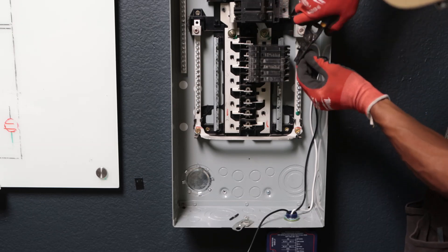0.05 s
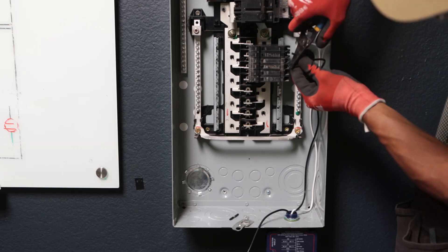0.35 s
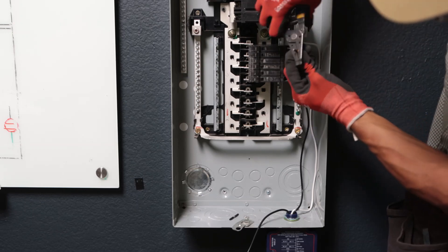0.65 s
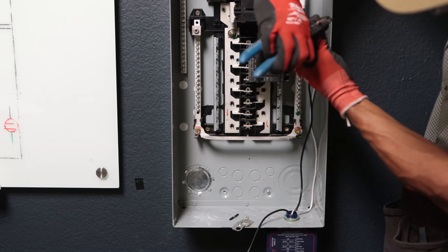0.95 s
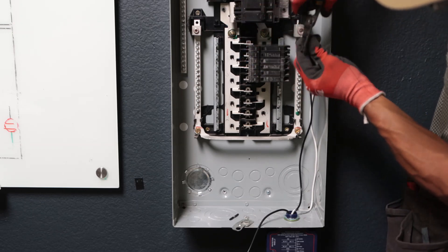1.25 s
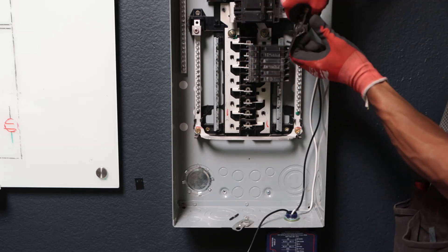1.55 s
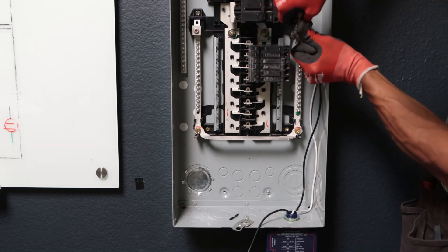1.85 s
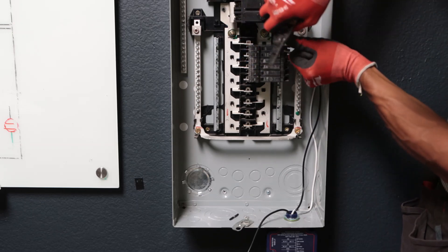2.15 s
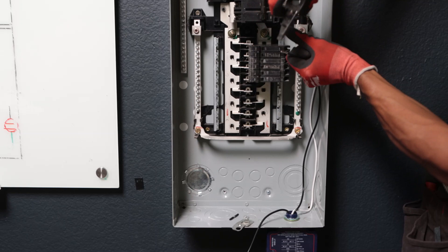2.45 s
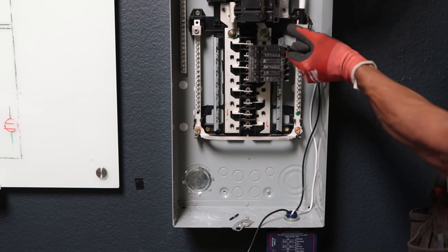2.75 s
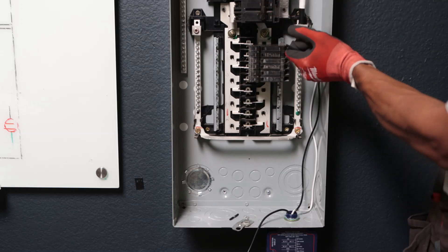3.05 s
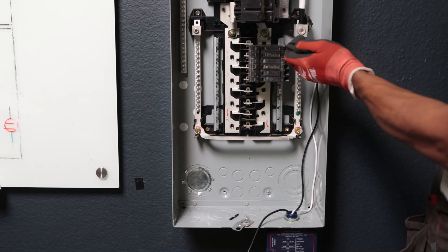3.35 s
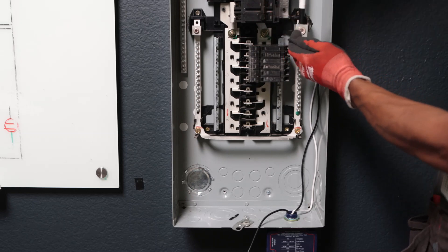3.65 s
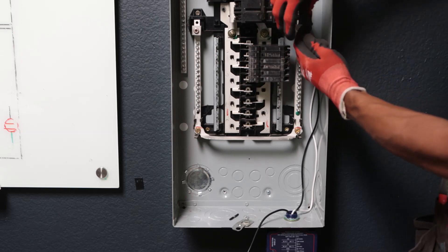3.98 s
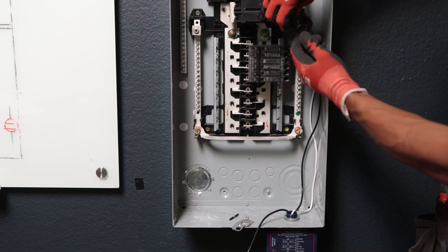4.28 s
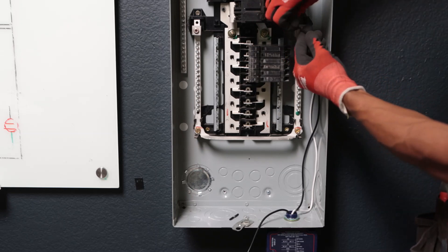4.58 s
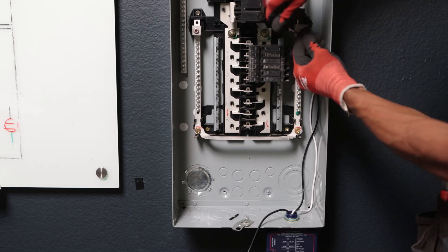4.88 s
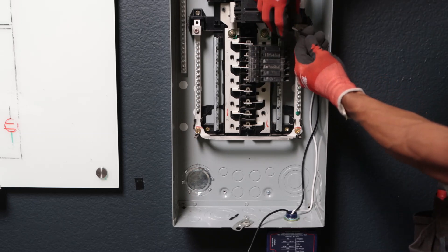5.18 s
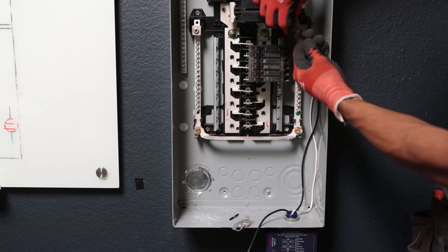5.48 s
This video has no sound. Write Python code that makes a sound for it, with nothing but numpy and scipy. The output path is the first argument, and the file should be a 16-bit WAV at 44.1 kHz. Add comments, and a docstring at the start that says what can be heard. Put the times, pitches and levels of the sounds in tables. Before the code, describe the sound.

A hand tool works inside an open steel electrical panel, making irregular knocks and small ticks that ring briefly and draw soft booms from the cabinet. Then comes the loudest sound, a sharp snap with a quick rattle of steel. Afterwards the tool taps thinly on a terminal while gloves and wires slide quietly. It all sounds close, in a small room with a faint rumble and hiss.

```python
"""In a small bare room, gloved hands work with a hand tool in an open steel breaker panel.
The tool knocks on breakers, ticks on wires and taps at a terminal; once a part snaps free
with a loud metallic clatter. Each hit is a burst of noise plus the fading tones of the metal.
Hits and pushes make the cabinet boom softly; gloves and wires rub over a low room noise."""
import sys
import numpy as np
from scipy import signal
from scipy.fft import rfft, irfft, next_fast_len
from scipy.io import wavfile
from scipy.ndimage import uniform_filter1d

SR = 44100
rng = np.random.default_rng(int(sys.argv[2]) if len(sys.argv) > 2 else 0)


def transcribe(signal):
    """Save signal, clipped to [-1, 1], as a 16-bit WAV file at the path in sys.argv[1]."""
    frames = np.atleast_2d(signal).T
    limited = np.clip(frames, -1, 1)
    pcm = np.round(limited * 32767).astype(np.int16)
    wavfile.write(sys.argv[1], SR, pcm)


N = 252233
FADE_TIME = np.arange(SR // 2) / SR  # seconds since a hit began

# tone colour of the tool's knocks and taps: pitch_hz, level_db
TOOL_COLOUR = [(100, -15.5), (230, -14.5), (300, -17.5), (450, -1), (700, -3.5), (880, -7.5), (1400, 0.5),
               (2200, -6.5), (3300, -9), (4000, -13), (5500, -14), (7200, -19.5), (8500, -26.5),
               (11000, -27), (15000, -48)]


def amp(db):
    return 10 ** (np.asarray(db) / 20)


def unit(x):
    return x / np.sqrt(np.mean(x ** 2) + 1e-20)


def unit_attack(x):
    """Scale each hit so its first 20 ms have an average power of 1."""
    return x / np.sqrt(np.mean(x[..., :SR // 50] ** 2, axis=-1, keepdims=True) + 1e-20)


def along(points, hz):
    """Read a curve between its points, on a musical pitch scale."""
    pitches, values = np.transpose(points)
    return np.interp(np.log(hz + 1), np.log(pitches + 1), values)


def add(track, start_s, sound):
    """Mix a sound into the track."""
    part = track[max(round(start_s * SR), 0):][:len(sound)]
    part += sound[:len(part)]


def placed(times, sounds):
    """A track with each sound at its time."""
    track = np.zeros(N)
    for start_s, sound in zip(times, sounds):
        add(track, start_s, sound)
    return track


def coloured(x, colour):
    """Make each pitch louder or softer to give a tone colour."""
    size = x.shape[-1]
    padded = 2 * next_fast_len(size // 2 + 2048, True)
    gain = amp(along(colour, np.fft.rfftfreq(padded, 1 / SR)))
    cepstrum = irfft(np.log(gain))
    # fold the filter so that nothing sounds before the hit
    cepstrum[1:padded // 2] *= 2
    cepstrum[padded // 2 + 1:] = 0
    return irfft(rfft(x, padded) * np.exp(rfft(cepstrum)))[..., :size]


def noise(colour, size):
    return unit(coloured(rng.standard_normal(size), colour))


def ringing(tones, count, scatter_db, rise_s):
    """Metal rings in a new mix of its tones at each hit; a tone drops 60 dB in fade_s."""
    pitch_hz, level_db, fade_s = np.transpose(tones)[:, :, None]
    waves = amp(level_db - 60 * FADE_TIME / fade_s) * np.exp(2j * np.pi * pitch_hz * FADE_TIME)
    shape = (count, len(tones))
    strength = amp(scatter_db * rng.standard_normal(shape))
    phase = np.exp(2j * np.pi * rng.random(shape))
    swell = 1 - np.exp(-FADE_TIME / rise_s)
    return unit_attack(((strength * phase) @ waves).imag * swell)


def contacts(colour, count, crack_db, crack_fade_s):
    """Each contact cracks, then echoes in cabinet and room; high pitches die first."""
    # how long cabinet and room ring: pitch_hz, fade_s
    echo_fades = [(150, 0.4), (550, 0.5), (1000, 0.39), (3000, 0.33), (6000, 0.32), (13000, 0.19)]
    white = rng.standard_normal((count, len(FADE_TIME)))
    hz, times, spectrum = signal.stft(white, SR, nperseg=256)
    fade = amp(-60 * times / along(echo_fades, hz)[:, None])
    echo = signal.istft(spectrum * fade, SR, nperseg=256)[1][:, :len(FADE_TIME)]
    crack = amp(crack_db - 60 * FADE_TIME / crack_fade_s) * rng.standard_normal(white.shape)
    return unit_attack(coloured(crack + echo, colour))


def brightened(hits, hardness_db, clack_db, clack_share):
    """Bare metal hits harder and more briefly than a glove, lifting the middle and high pitches."""
    bands_hz = [(830, "low"), ([830, 3220], "band"), (3220, "high")]
    filters = [signal.butter(3, hz, kind, fs=SR, output="sos") for hz, kind in bands_hz]
    body, clack, edge = [unit_attack(signal.sosfilt(band, hits)) for band in filters]
    return body + amp(clack_db + clack_share * hardness_db) * clack + amp(hardness_db) * edge


def cabinet_flexes(count):
    """The cabinet's back bends and swells into a low boom."""
    # the cabinet's tones: pitch_hz, level_db, fade_s
    cabinet_tones = [(107.2, 8, 0.36), (125, 4.5, 0.54), (194, -27, 0.16), (247.7, -10.5, 0.43)]
    swing = ringing(cabinet_tones, count, scatter_db=-1.5, rise_s=0.016)
    return swing / np.abs(swing).max(axis=1, keepdims=True)


def struck(events, tones, colour, ring_db, rise_s, crack_db, crack_fade_s,
           clack_db, clack_share, flex_db, thud_db):
    """A struck part cracks, rings and flexes the cabinet; softer contacts thud more."""
    # tone colour of a dull thud: pitch_hz, level_db
    thud_colour = [(20, -23), (35, -15.5), (52, 4.5), (85, -4), (180, -6), (320, -11.5), (600, -30.5),
                   (1500, -66)]
    times, level_db, hardness_db = np.transpose(events)
    strength, hardness_db = amp(level_db[:, None]), hardness_db[:, None]
    count = len(times)
    ring = amp(ring_db) * ringing(tones, count, scatter_db=4, rise_s=rise_s)
    contact = contacts(colour, count, crack_db, crack_fade_s)
    hits = brightened(contact + ring, hardness_db, clack_db, clack_share)
    thud_gain = amp(thud_db - 0.59 * hardness_db)
    thud = thud_gain * contacts(thud_colour, count, crack_db=-11.5, crack_fade_s=0.04)
    boom = amp(flex_db) * cabinet_flexes(count)
    return placed(times, strength * (hits + thud + boom))


def room_noise():
    """A low rumble and an even hiss fill the room."""
    # tone colours of the rumble and the hiss: pitch_hz, level_db
    rumble_colour = [(12, -42), (20, -16.5), (59, -5.5), (86, -7), (98, -5.5), (112, 0), (128, -1.5),
                     (136, -11.5), (140, -21.5), (166, -10.5), (220, -21), (290, -44.5), (480, -120)]
    hiss_colour = [(120, -26.5), (200, -3), (280, -1.5), (340, -3.5), (450, -5), (800, -7), (1300, -11),
                   (2000, -14.5), (4000, -16), (5800, -15), (7500, -20), (15400, -24)]
    return amp(-58) * (noise(rumble_colour, N) + noise(hiss_colour, N))


def glove_rubs():
    """Gloves and wires slide, catching and slipping as they go."""
    # strokes of glove and wire: start_s, length_s, level_db
    strokes = [(0.022, 0.26, -55.5), (0.55, 0.31, -61.5), (1.109, 0.27, -55.5), (2.206, 0.35, -62.5),
               (3.163, 0.23, -53), (4.135, .18, -60.5), (4.229, .16, -52), (4.488, 0.21, -56),
               (4.814, .14, -49), (5.5, .18, -63.5)]
    # tone colour of rubbing: pitch_hz, level_db
    rub_colour = [(200, 2.5), (700, 2.5), (1800, 1.5), (3400, -1), (6500, -2.5), (9000, -11.5),
                  (14000, -14.5)]
    track = np.zeros(N)
    for start_s, length_s, level_db in strokes:
        size = int(length_s * SR)
        grip = unit(uniform_filter1d(rng.standard_normal(len(FADE_TIME)), size=300))
        rub = unit(amp(1.5 * grip) * noise(rub_colour, len(FADE_TIME)))
        add(track, start_s, amp(level_db) * np.hanning(size) * rub[:size])
    return track


def breaker_knocks():
    """The tool hits the breaker block, which rings on its steel pan."""
    # knocks of the tool: start_s, level_db, hardness_db
    knocks = [(0.154, -44, -33), (0.185, -53.5, -10.5), (0.314, -51.5, -1.5), (1.333, -26, 0),
              (1.344, -34, 6), (1.371, -37.5, -7), (1.428, -34, 3), (1.830, -41.5, 7), (1.856, -39.5, -28),
              (2.023, -36, -6), (2.045, -37, -34), (2.088, -36.5, -20), (2.125, -41.5, -14),
              (2.205, -47.5, -27), (3.257, -41.5, -10)]
    # the block's tones: pitch_hz, level_db, fade_s
    block_tones = [(236, -10, 0.43), (379.2, -14, 1), (452, -5.5, 0.26), (513, 4, 0.2),
                   (513.5, -11.5, 0.81), (644, 6, 0.34), (680, 8.5, 0.06), (752, 5, 0.1), (963, -13, 0.25),
                   (1003, -49, .3), (1306, -3.5, 0.17), (1310, -24.5, 0.5), (1586, -10, 0.3),
                   (1723, -1, .33), (1814, -7.5, 0.41), (2830, -15, 0.17), (3090, 2, 0.11)]
    return struck(knocks, block_tones, TOOL_COLOUR, ring_db=-4, rise_s=0.0052, crack_db=3.5,
                  crack_fade_s=0.072, clack_db=3.5, clack_share=0.62, flex_db=-13.5, thud_db=-24)


def cabinet_booms():
    """A hand leans on the cabinet and bends its back without a knock."""
    # pushes of the hand: start_s, level_db
    pushes = [(0.165, -35), (0.251, -38), (1.744, -40.5), (1.791, -48)]
    times, level_db = np.transpose(pushes)
    return placed(times, amp(level_db)[:, None] * cabinet_flexes(len(times)))


def wire_ticks():
    """The tool brushes a wire and its tip rings for an instant."""
    # light touches of metal on wire: start_s, level_db
    ticks = [(0.597, -58), (1.048, -61.5), (1.487, -49.5), (2.025, -43), (2.493, -48.5), (5.466, -43.5),
             (5.694, -61.5)]
    # the tip's tones, damped by the hand: pitch_hz, level_db, fade_s
    tip_tones = [(2550, 3, 0.03), (4300, -10, 0.0053), (6040, -14, 0.17), (9600, 1, 0.012)]
    # tone colour of a tick: pitch_hz, level_db
    tick_colour = [(300, -34), (1200, 0.5), (1900, 2), (2400, 0.5), (3100, -0.5), (4200, 6), (6000, 2),
                   (7500, -3.5), (11000, -1), (15000, -10.5)]
    times, level_db = np.transpose(ticks)
    ring = amp(-10) * ringing(tip_tones, len(times), scatter_db=8.5, rise_s=0.00014)
    touch = amp(-1.5) * contacts(tick_colour, len(times), crack_db=12, crack_fade_s=0.018)
    return placed(times, amp(level_db)[:, None] * (touch + ring))


def part_snap():
    """A part gives way and clatters; each bounce rings the same steel tones."""
    # the snap and its bounces: start_s, level_db, hardness_db
    clatter = [(3.268, -25, -5.5), (3.340, -21, 1), (3.363, -17, 5), (3.390, -29.5, 9), (3.407, -28, 11),
               (3.433, -24, 6)]
    # tones of the part and its mount: pitch_hz, level_db, fade_s
    steel_tones = [(192, -17, .33), (447, -3, .36), (520, -13, .4), (569, -12, .34), (599, -1, .31),
                   (644, -12, .34), (1148, -12, .25), (1620, -14, .33), (1663, -16, .4), (2006, -10, .29),
                   (2452, -13, .29), (3050, -11, .26), (3165, -6.5, .27), (3935, -14, .27), (4130, -8, .27),
                   (4361, -8, .24), (4399, -6, .24), (4743, -10, .25), (4941, -7, .25), (5286, -4, .23),
                   (5476, -5, .22), (5518, -2, .23), (5786, -10, .24), (6329, -7, .26), (6350, -7, .26),
                   (6772, -11, .27), (7243, -12, .27), (7476, -8, .22), (7784, -11, .25), (8280, -14, .24)]
    # tone colour of the snap: pitch_hz, level_db
    snap_colour = [(100, -19.5), (200, -11), (310, -14.5), (480, 2), (640, -6), (850, -12.5), (1120, -9),
                   (1400, -18), (1680, -1.5), (2000, -6.5), (2240, -12), (3150, -0.5), (3700, -3),
                   (5500, 1), (8500, -6.5), (12500, -9.5), (15500, -33)]
    return struck(clatter, steel_tones, snap_colour, ring_db=-3.5, rise_s=0.0021, crack_db=4.5,
                  crack_fade_s=0.048, clack_db=-1.5, clack_share=0.073, flex_db=-14.5, thud_db=-33.5)


def terminal_taps():
    """The tool seats and slips at a wire terminal, with a thinner ring."""
    # taps of the tool: start_s, level_db, hardness_db
    taps = [(4.335, -39, -2), (4.463, -46, -7), (4.623, -52.5, -3), (4.686, -50, -9), (4.704, -51, 5),
            (4.881, -66, 14.5), (5.372, -66.5, -7), (5.610, -52.5, -16.5)]
    # tones of the terminal and its bar: pitch_hz, level_db, fade_s
    terminal_tones = [(238, -10, .35), (383, -10, .5), (440, -10, .4), (520, -11, .35), (687, 2, .36),
                      (778, -9, .35), (985, -9, .3), (1150, -9, .3), (1274, -2, .32), (1393, -8, .3),
                      (1690, -7, .3), (1794, -2, .33), (1835, -9, .4), (2372, -9, .35), (3433, -9, .33),
                      (5620, -18, .3)]
    return struck(taps, terminal_tones, TOOL_COLOUR, ring_db=-1.5, rise_s=0.0011, crack_db=2.5,
                  crack_fade_s=0.057, clack_db=7, clack_share=0.43, flex_db=-10, thud_db=-38)


def scene():
    """All the sounds together in one channel."""
    hits = breaker_knocks() + terminal_taps() + part_snap() + wire_ticks()
    return (hits + cabinet_booms() + glove_rubs() + room_noise())[None]


def record(dry):
    """Clip any peak past full scale and cut the very highest pitches."""
    padded = next_fast_len(N + 4096)
    passed = np.fft.rfftfreq(padded, 1 / SR) < 15700  # Hz
    return irfft(rfft(np.clip(dry, -1, 1), padded) * passed, padded)[..., :N]


dry = scene()
out = record(dry)
transcribe(out)
```